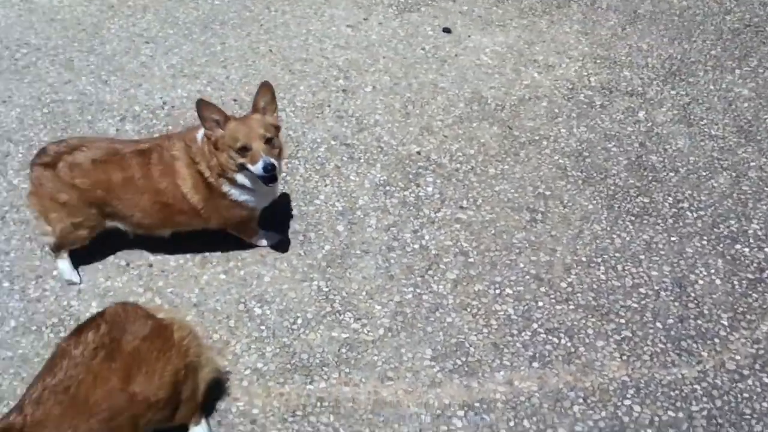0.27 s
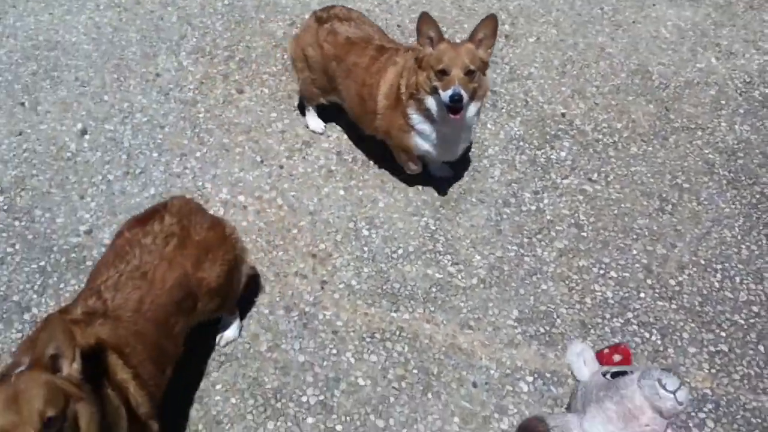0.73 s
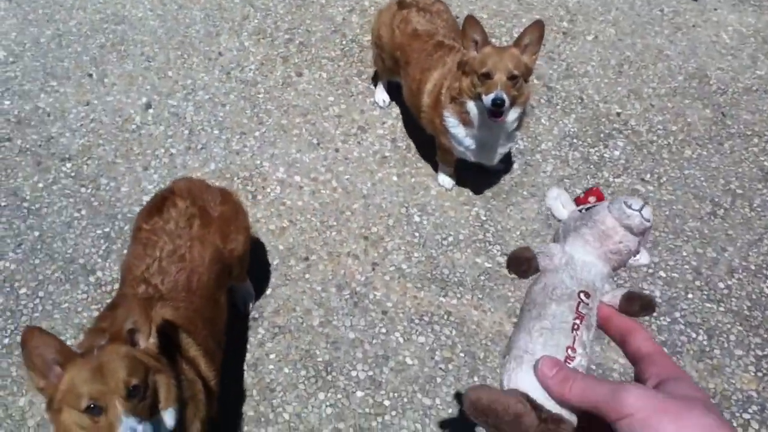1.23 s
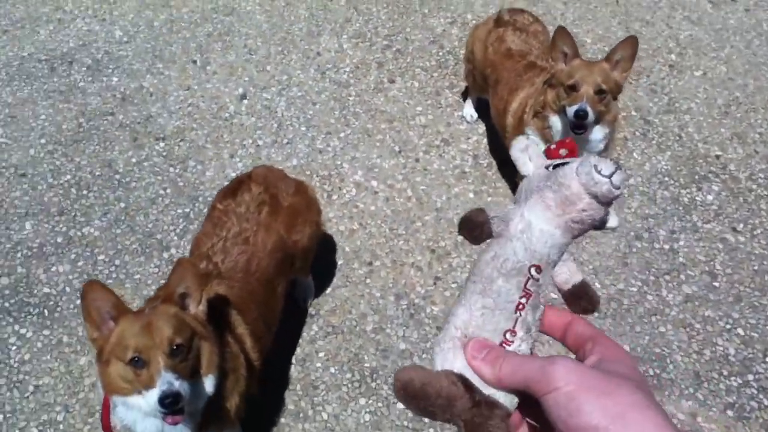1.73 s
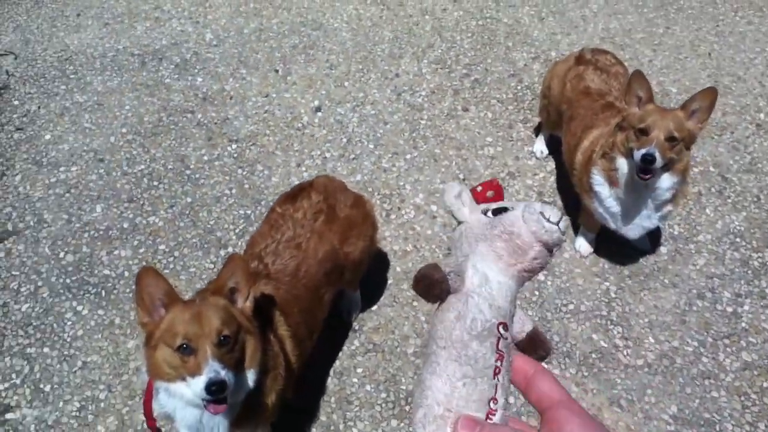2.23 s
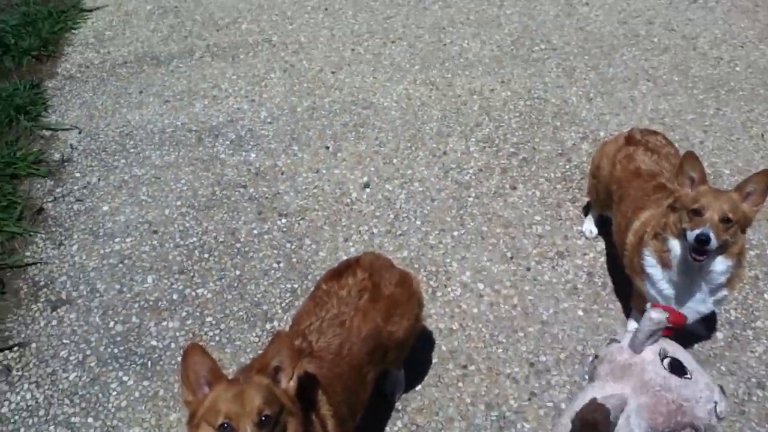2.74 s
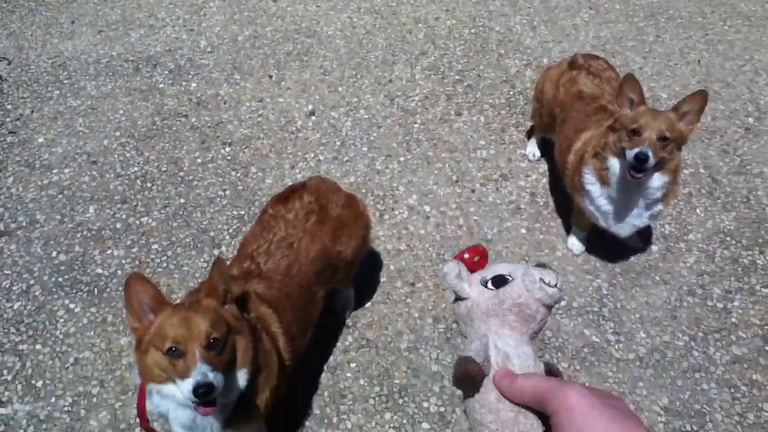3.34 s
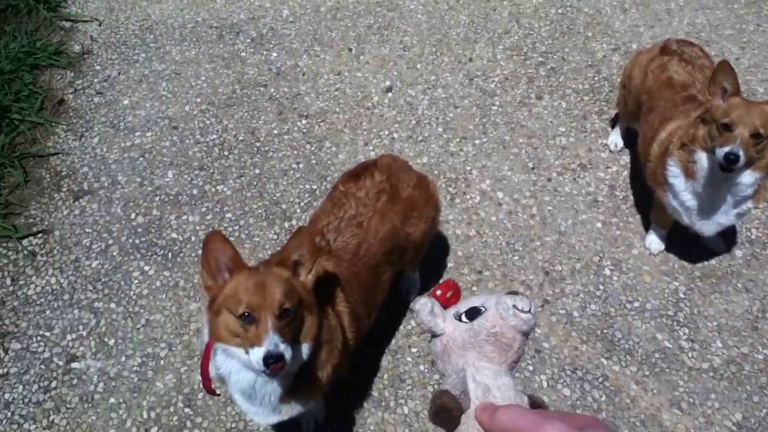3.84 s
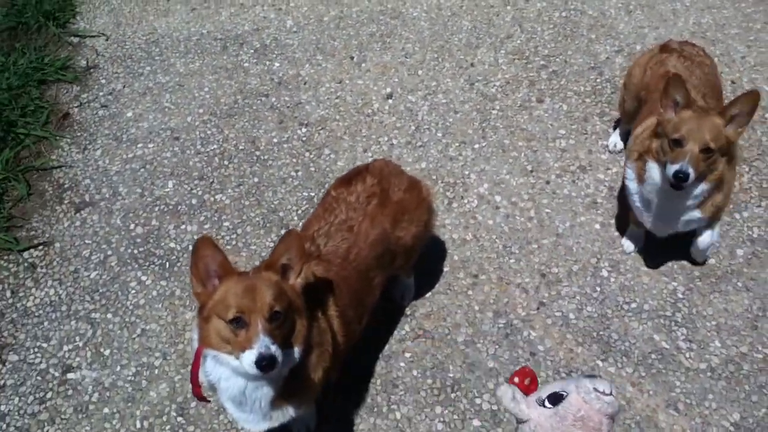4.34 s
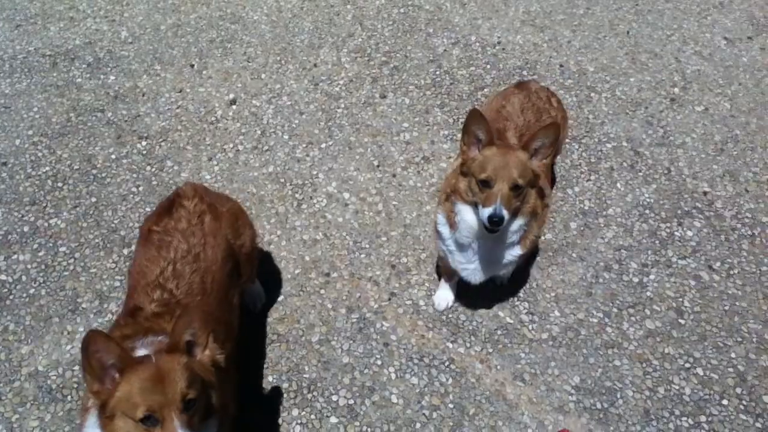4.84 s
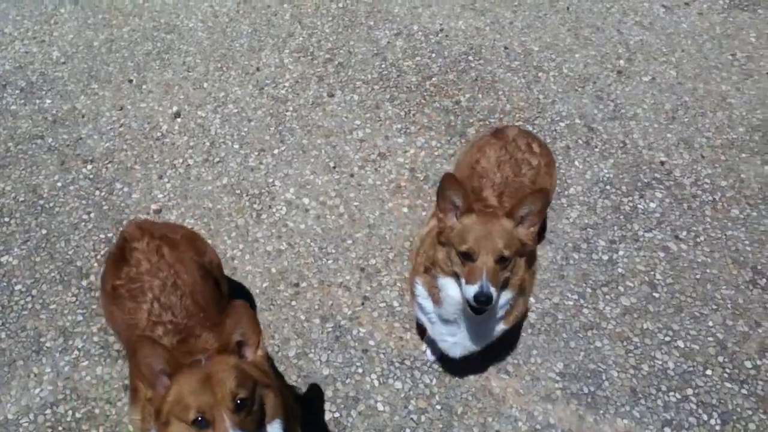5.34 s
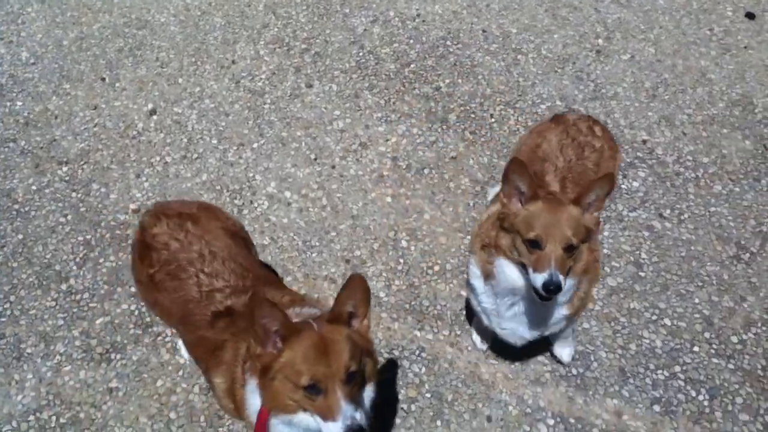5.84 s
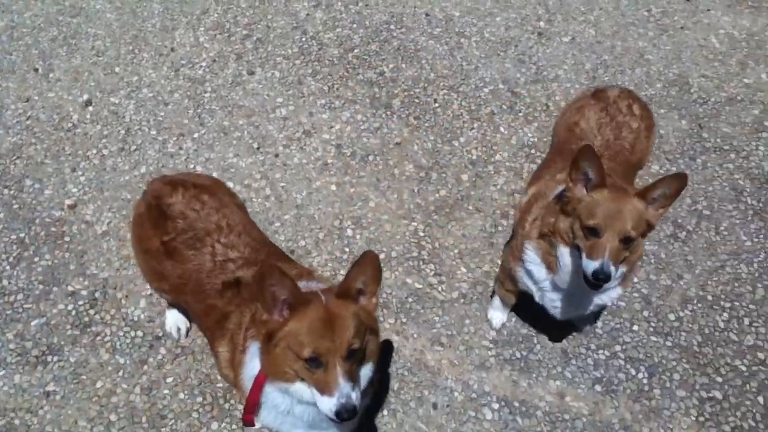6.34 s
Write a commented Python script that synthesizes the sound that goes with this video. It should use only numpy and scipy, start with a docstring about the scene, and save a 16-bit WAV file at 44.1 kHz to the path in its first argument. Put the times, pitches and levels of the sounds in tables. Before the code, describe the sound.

Two small dogs click and whine softly on paving before a hand-squeezed toy bursts into loud, arching high squeaks, each answered by a softer breathy one.

```python
"""Plush squeaker with dogs

A hand pumps a toy's reed squeaker over a paved drive: squeezes give bright arching squeaks, refills softer ones.
The reed is a stack of partials and leak hiss, coloured by the pipe, with a ground bounce and echo tails.
Dogs whine and whimper (gliding tones), pant and scuffle (swelling noise) and click their claws (ringing ticks).
Birds whistle as gliding sines; a resonant hiss comes and goes over a steady outdoor hush.
"""
import sys
import numpy as np
from scipy import signal
from scipy.fft import rfft, irfft
from scipy.io import wavfile
from scipy.ndimage import uniform_filter1d

SR = 44100
rng = np.random.default_rng(int(sys.argv[2]) if len(sys.argv) > 2 else 0)


def wrap_up_sound(samples):
    """Save the sound to the file named by the first command line argument, as 16-bit audio."""
    columns = np.atleast_2d(samples).T
    # keep every value between -1 and 1, then stretch to whole-number steps
    tamed = np.clip(columns, -1, 1)
    steps = np.round(tamed * 32767).astype(np.int16)
    wavfile.write(sys.argv[1], SR, steps)


N = 290613


def amp(db):
    """Decibels to gain."""
    return 10 ** (np.asarray(db) / 20)


def evened(x):
    """Scales to rms 1."""
    return x / np.sqrt(np.mean(x ** 2) + 1e-20)


def read(points, hz):
    """Reads a spectrum table on a log-frequency axis."""
    f, value = np.transpose(points)
    return np.interp(np.log(hz + 1), np.log(f + 1), value)


def add(mix, start_s, sound):
    """Mixes a sound in at its start time."""
    part = mix[round(start_s * SR):][:len(sound)]
    part += sound[:len(part)]


def wander(length, size):
    """Smooth random drift of rms 1: white noise averaged twice over size samples."""
    once = uniform_filter1d(rng.standard_normal(length), size)
    return evened(uniform_filter1d(once, size))


def noise(colour, patchy_db):
    """Random short-time spectra with a colour and drifting patches, rms 1."""
    frames, hz = N // 256 + 5, np.fft.rfftfreq(1024, 1 / SR)
    real, imag, patches = rng.standard_normal((frames, 513, 3)).T
    patches = uniform_filter1d(patches, 12, 0)  # across frequency
    patches = evened(uniform_filter1d(patches, 14, 1))  # across time
    spectra = (real + 1j * imag) * amp(read(colour, hz)[:, None] + patchy_db * patches)
    return evened(signal.istft(spectra, nperseg=1024, noverlap=768)[1][:N])


def swell(t, start_s, hold_s, db, rise_db_per_s, fall_db_per_s):
    """Gain that rises to its level at start, holds, and falls away."""
    before_s = np.maximum(start_s - t, 0)
    after_s = np.maximum(t - start_s - hold_s, 0)
    return amp(db - rise_db_per_s * before_s - fall_db_per_s * after_s)


def swells(rows, rise_db_per_s, fall_db_per_s):
    """Sum of all swells of a table on one time line."""
    t = np.arange(N) / SR
    return sum(swell(t, *row, rise_db_per_s, fall_db_per_s) for row in rows)


def scatter(x, t60_s, build_s, dull_db_per_khz):
    """Diffuse echoes from walls and hedges: sparse taps of random sign, treble dying first."""
    taps = np.zeros(SR // 2)
    at = np.arange(0, len(taps) - 20, 20)
    taps[at + rng.integers(0, 20, len(at))] = rng.choice([-1., 1.], len(at))
    hz, t, spectra = signal.stft(taps, SR, nperseg=256)
    hz = hz[:, None]
    fall_db = -60 * t / t60_s * (1 + hz / 9000) - dull_db_per_khz * hz / 1000
    build = np.clip(t / build_s, 0, 1)
    tail = signal.istft(spectra * amp(fall_db) * build, SR, nperseg=256)[1]
    return signal.fftconvolve(x, tail / np.linalg.norm(tail))[:N]


def bounce(x, delay_s, db, dull_hz):
    """One reflection from a hard surface, dulled by a first-order low-pass."""
    late = np.r_[np.zeros(round(delay_s * SR)), x][:N]
    return amp(db) * signal.lfilter(*signal.butter(1, dull_hz, fs=SR), late)


# Outdoor hush spectrum. Each row: frequency in Hz, relative density in dB per Hz.
HUSH_COLOUR = [(15, -55.5), (25, -31.5), (68, -5), (242, -3.5), (277, -3), (416, -9.5), (591, -6),
               (1230, -15.5), (2160, -17), (4610, -20.5), (6050, -23.5), (6740, -22.5), (16000, -28)]
HUSH_RMS_DB = -54


def outdoor_hush():
    """Steady broadband noise, strongest in the lows."""
    return amp(HUSH_RMS_DB) * noise(HUSH_COLOUR, patchy_db=1.5)


# Level curve of the far hiss. Each row: time in seconds, level in dB.
FAR_HISS_LEVELS = [(0.0, -65), (0.37, -57), (0.701, -84), (0.85, -77), (0.91, -48.5), (1.01, -68),
                   (1.28, -59), (1.55, -55), (1.95, -78), (2.02, -64), (2.38, -60.5), (2.8, -87),
                   (3.38, -68), (3.44, -58)]
FAR_HISS_HZ, FAR_HISS_Q = 2150, 5.5


def far_hiss():
    """White noise through one resonance, swelling and fading along its curve."""
    s, db = np.transpose(FAR_HISS_LEVELS + [(3.6, -69)])
    band = signal.lfilter(*signal.iirpeak(FAR_HISS_HZ, FAR_HISS_Q, SR), rng.standard_normal(N))
    return amp(np.interp(np.arange(N) / SR, s, db)) * evened(band)


def whistle(hz, db, waver):
    """A thin sine with soft ends, wavering in pitch (share) and level."""
    hz = hz * (1 + waver * wander(len(hz), size=60))
    gain = amp(db + 2.6 * wander(len(hz), size=120)) * signal.windows.tukey(len(hz), .4)
    return gain * np.sin(2 * np.pi * np.cumsum(hz) / SR)


# Short bird strokes. Each row: start in seconds, end in seconds, start in Hz, end in Hz, level in dB.
BIRD_STROKES = [(.04, 0.056, 4300, 3700, -60), (0.08, 0.1, 3450, 4330, -61),
                (1.301, 1.329, 3840, 3000, -53), (1.348, 1.359, 3600, 2490, -53),
                (1.372, 1.395, 3420, 2500, -55), (1.898, 1.931, 3920, 4600, -58),
                (1.927, 2.0, 4470, 2120, -58), (1.965, 2.0, 4250, 4200, -61),
                (2.01, 2.033, 3150, 3270, -56), (2.366, 2.425, 4300, 4200, -59),
                (2.754, 2.765, 4520, 3900, -58), (2.778, 2.795, 3200, 4000, -62),
                (2.872, 2.885, 2390, 1300, -55), (2.922, 3.006, 3060, 1340, -64),
                (3.283, 3.329, 4000, 3580, -55.5), (3.357, 3.415, 3180, 3090, -58)]
# Long notes of one high bird. Each row: start in seconds, level in dB.
LONG_NOTES = [(1.36, -59.5), (3.11, -58.5)]
# Pitch curve of each long note. Each row: seconds after its start, pitch in Hz.
LONG_TUNE = [(0, 6450), (.03, 6020), (.15, 5950), (.19, 5360)]


def birds():
    """Thin whistles: short strokes glide straight, long notes share one pitch curve."""
    out = np.zeros(N)
    for start_s, end_s, start_hz, end_hz, db in BIRD_STROKES:
        glide_hz = np.linspace(start_hz, end_hz, round((end_s - start_s) * SR))
        add(out, start_s, whistle(glide_hz, db, waver=.016))
    s, hz = np.transpose(LONG_TUNE)
    tune_hz = np.interp(np.arange(0, s[-1], 1 / SR), s, hz)
    for start_s, db in LONG_NOTES:
        add(out, start_s, whistle(tune_hz, db, waver=.005))
    return out


# A finger taps the phone. The row: time in seconds, level in dB, pitch in Hz.
PHONE_TAP = (5.96, -30.5, 340)


def phone_tap():
    """A dull push on the phone body: a low sine that dies 60 dB in 19 ms."""
    out, t = np.zeros(N), np.arange(900) / SR
    start_s, db, hz = PHONE_TAP
    add(out, start_s, amp(db - 60 * t / 0.019) * np.sin(2 * np.pi * hz * t))
    return out


# Huffs and scuffles of the dogs. Each row: start in seconds, hold in seconds, level in dB.
HUFFS = [(0, 0.077, -56.5), (.17, .03, -55), (.36, 0.071, -50), (.46, 0.14, -53.5), (.745, 0.055, -54.5),
         (.885, .06, -53.5), (1.26, 0.11, -60), (1.5, 0.19, -58), (1.98, .06, -68), (2.58, .02, -56.5),
         (3.0, 0.036, -60.5), (3.33, 0.16, -62)]
# Their spectrum. Each row: frequency in Hz, relative density in dB per Hz.
HUFF_COLOUR = [(250, -45), (470, -1.5), (800, 0), (1060, -3.5), (1590, -5), (1820, 1), (2630, -7.5),
               (3050, -6), (7830, -16), (8850, -14.5), (15000, -36)]
HUFF_RISE_DB_PER_S, HUFF_FALL_DB_PER_S = 313, 235
GRIT_PER_S, GRIT_DB = 400, -15.5  # grit level is relative to the breath


def huffs():
    """Breathy noise that swells with the dogs' bustle, with random grit grains crackling under their paws."""
    size_db = 3.5 * np.minimum(rng.exponential(1, N), 4)
    grains = amp(size_db) * (rng.random(N) < GRIT_PER_S / SR) * rng.choice([-1, 1], N)
    band = signal.butter(2, [3500, 11000], "bandpass", fs=SR)
    grit = evened(signal.lfilter(*band, grains))
    breath = noise(HUFF_COLOUR, patchy_db=3.0)
    return swells(HUFFS, HUFF_RISE_DB_PER_S, HUFF_FALL_DB_PER_S) * (breath + amp(GRIT_DB) * grit)


# Claws on the paving. Each row: time in seconds, level in dB.
CLAWS = [(0.0943, -40), (0.1014, -49), (0.138, -41), (0.179, -33.5), (0.1954, -36.5), (0.39, -37),
         (0.397, -37), (0.408, -31), (0.416, -34), (0.49, -36.5), (0.607, -31), (0.624, -35), (0.782, -36),
         (0.8395, -40), (0.8677, -34), (0.9244, -39), (0.937, -33), (0.947, -36), (1.0665, -43),
         (1.074, -38.5), (1.089, -40), (2.58, -41), (4.3287, -36), (5.2494, -27)]
CLAW_LOW_HZ, CLAW_HIGH_HZ = 3950, 7270  # each tick rings somewhere in this range
LIGHT_CLAWS_PER_S, LIGHT_CLAW_DB, SETTLED_S = 7, -40.5, 1.15  # random lighter ticks until the dogs settle
CLAW_T60_S, SLOT_S = 0.0093, .01


def claws():
    """Short ticks: a gritty click and a sine ring that die together."""
    out, t = np.zeros(N), np.arange(400) / SR
    band = signal.butter(2, [3000, 12000], "bandpass", fs=SR)
    slots = np.arange(0, SETTLED_S, SLOT_S)
    light = slots[rng.random(len(slots)) < LIGHT_CLAWS_PER_S * SLOT_S]
    for start_s, db in CLAWS + [(s, LIGHT_CLAW_DB) for s in light]:
        hz = rng.uniform(CLAW_LOW_HZ, CLAW_HIGH_HZ)
        grit = signal.lfilter(*band, rng.standard_normal(400))
        ring = np.sin(2 * np.pi * hz * t)
        add(out, start_s, amp(db - 60 * t / CLAW_T60_S) * (.5 * ring + 0.86 * grit))
    return out


# Panting puffs close by. Each row: start in seconds, hold in seconds, level in dB.
PANTS = [(5.345, 0.0068, -37), (5.72, 0.038, -37.5), (6.13, .06, -32.5), (6.54, .05, -41.5)]
# Softer air between the puffs. The row: start in seconds, hold in seconds, level in dB.
PANT_REST = (5.4, 0.68, -48.5)
# The open mouth they ring. Each row: frequency in Hz, relative density in dB per Hz.
MOUTH_COLOUR = [(250, -42), (600, -15), (1100, -10.5), (1550, -1.5), (2050, -2.5), (2600, -4.5), (3700, -2),
                (4700, -8.5), (6000, -16), (9000, -22.5), (14000, -38)]
PANT_RISE_DB_PER_S, PANT_FALL_DB_PER_S = 502, 255


def pants():
    """Puffs of air noise coloured by the nearer dog's mouth."""
    gain = swells(PANTS + [PANT_REST], PANT_RISE_DB_PER_S, PANT_FALL_DB_PER_S)
    return gain * noise(MOUTH_COLOUR, patchy_db=5.0)


# Thin whimpers. Each row: start in seconds, end in seconds, start in Hz, end in Hz, start in dB, end in dB,
# pitch roughness as a share.
WHIMPERS = [(.735, 0.823, 630, 618, -57, -58, 0.023), (1.487, 1.665, 600, 592, -49.5, -56.5, 0.04),
            (4.94, 5.07, 1120, 1200, -35.5, -42, .004), (5.576, 5.76, 1004, 1252, -45.5, -36.5, 0.0045),
            (5.778, 5.843, 920, 990, -47.5, -41, .011), (6.218, 6.253, 983, 1030, -50, -41, .01)]
# Colour of their open mouth. Each row: frequency in Hz, gain in dB.
WHIMPER_COLOUR = [(550, -18), (1150, -10.5), (1800, 6), (2300, -5.5), (3000, 1), (3500, -2.5), (4700, -12),
                  (6000, -18), (8000, -33)]


def whimpers():
    """Faint cries through an open mouth: eight harmonics of a rough gliding pitch."""
    out, k = np.zeros(N), np.arange(1, 9)[:, None]
    for start_s, end_s, start_hz, end_hz, start_db, end_db, rough in WHIMPERS:
        count = round((end_s - start_s) * SR)
        hz = np.linspace(start_hz, end_hz, count) * (1 + rough * wander(count, size=80))
        turns = np.cumsum(hz) / SR
        partial_gain = amp(read(WHIMPER_COLOUR, k * (start_hz + end_hz) / 2))
        stack = partial_gain * np.cos(2 * np.pi * (k * turns + rng.random(k.shape)))
        gain = amp(np.linspace(start_db, end_db, count)) * signal.windows.tukey(count, .25)
        add(out, start_s, gain * evened(stack.sum(0)))
    return out


def whine(hz, gain):
    """A slightly unsteady near-sine with a weak octave."""
    turns = np.cumsum(hz * (1 + .004 * wander(len(hz), size=400))) / SR
    tone = np.sin(2 * np.pi * turns) + amp(-28.5) * np.sin(4 * np.pi * turns)
    return np.sqrt(2) * gain * amp(wander(len(hz), size=500)) * tone


# Long whines, one table each. Each row: time in seconds, pitch in Hz, level in dB.
LONG_WHINES = [
    [(0, 712, -42), (.045, 736, -42.5), (.07, 601, -37), (.1, 544, -58)],
    [(.725, 644, -56), (.75, 648, -41.5), (.772, 570, -40), (.792, 716, -37), (.85, 702.3, -41),
     (.91, 673, -38), (.935, 615.6, -41.5), (1.03, 565, -53), (1.14, 537, -65)],
    [(6.49, 598, -87.5), (6.52, 574, -45.5), (6.562, 669, -33), (6.59, 642, -40)],
]
# Short whines. Each row: start in seconds, length in seconds, start in Hz, end in Hz, level in dB.
YIPS = [(0.107, 0.039, 683, 746, -46), (0.191, 0.028, 725, 745, -47), (0.441, 0.067, 582, 584, -43),
        (.46, .1, 717, 730, -53), (0.97, 0.11, 700, 665, -54), (2.471, 0.078, 598, 627, -52.5),
        (2.5, 0.13, 745, 727, -55.5), (2.623, 0.04, 576, 590, -54), (2.656, 0.052, 690, 690, -55),
        (3.042, .05, 564, 575, -58), (3.09, .07, 597, 596, -61), (3.319, 0.047, 594, 590, -59),
        (3.343, 0.16, 702, 634, -56.5), (3.487, 0.14, 600, 570, -56), (3.635, 0.14, 614, 612, -57.5)]
YIP_RISE_DB_PER_S, YIP_FALL_DB_PER_S = 450, 897


def whines():
    """Closed-mouth whines: long ones follow their curves, short ones glide straight."""
    out = np.zeros(N)
    for rows in LONG_WHINES:
        s, hz, db = np.transpose(rows)
        t = np.arange(s[0], s[-1], 1 / SR)
        add(out, s[0], whine(np.interp(t, s, hz), amp(np.interp(t, s, db))))
    for start_s, length_s, start_hz, end_hz, db in YIPS:
        t = np.arange(-.05, length_s + .05, 1 / SR)  # room for the rise and the fall
        gain = swell(t, .015, length_s - .03, db, YIP_RISE_DB_PER_S, YIP_FALL_DB_PER_S)
        glide_hz = np.interp(t, [0, length_s], [start_hz, end_hz])
        add(out, start_s + t[0], whine(glide_hz, gain))
    return out


# Plush rubbing in the grip. Each row: start in seconds, hold in seconds, level in dB.
RUBS = [(5.69, 0.013, -63), (5.895, 0.023, -47), (6.295, 0.034, -38)]
RUB_RISE_DB_PER_S, RUB_FALL_DB_PER_S = 693, 600


def rubs():
    """Fine bright fibre noise, uneven in level."""
    fibres = rng.standard_normal(N) * amp(5 * wander(N, size=90))
    band = signal.butter(2, [4500, 13000], "bandpass", fs=SR)
    gain = swells(RUBS, RUB_RISE_DB_PER_S, RUB_FALL_DB_PER_S)
    return gain * evened(signal.lfilter(*band, fibres))


# The hand turns the toy away. Each row: time in seconds, share turned.
TURNED = [(5.2, 0.02), (5.7, 1), (6.3, 1.27)]
# Colour change at share 1. Each row: frequency in Hz, gain in dB.
TURNED_COLOUR = [(800, 4.5), (1300, 5.5), (2500, -1.5), (5000, -1), (8000, 3.1), (11000, 3), (15000, 11.5)]


def turned_share(s):
    """How far the toy is turned away at time s."""
    return np.interp(s, *np.transpose(TURNED))


def heard(colour, s):
    """The squeaker colour that reaches the microphone at time s."""
    return [(hz, db + turned_share(s) * read(TURNED_COLOUR, hz)) for hz, db in colour]


def arch(t, times, start, end, top, bow_up, bow_down, size):
    """Runs from start to top to end along two bowed lines, the corner rounded over size samples."""
    u = np.interp(t, times, [0, 1, 0])
    rising = t < times[1]
    straight = np.where(rising, start, end) * (1 - u) + top * u
    bow = 4 * u * (1 - u) * np.where(rising, bow_up, bow_down)
    return uniform_filter1d(straight + bow, size=size, mode="nearest")


RISE_BOW_DB = 0.18  # the level runs a little above a straight rise
PARTIALS, PARTIAL_LIMIT_HZ, FLUTTER_DB = 20, 18000, 1.8
LATE_ABOVE_HZ = 5000


def squeak(row, fall, colour, ring_late_s, hiss_db, jitter, attack_s, fade_db_per_s, size):
    """The reed chops the air once a cycle; the pulses and some leak hiss ring the pipe."""
    times, (start_hz, top_hz, rise_bow_hz, fall_bow_hz, start_db, top_db) = row[:3], row[3:]
    stall_hz, drop_db, fall_bow_db, droop_hz_per_s = fall
    t = np.arange(times[0] - attack_s, times[2] + 0.02, 1 / SR)
    after_s = np.maximum(t - times[2], 0)

    hz = arch(t, times, start_hz, stall_hz, top_hz, rise_bow_hz, fall_bow_hz, size=size)
    hz = hz * (1 + jitter * wander(len(t), size=40)) - droop_hz_per_s * after_s
    db = arch(t, times, start_db, top_db + drop_db, top_db, RISE_BOW_DB, fall_bow_db, size=100)
    db = db - fade_db_per_s * after_s

    grid_hz = np.fft.fftfreq(4096, 1 / SR)
    log_gain = np.log(amp(read(colour, abs(grid_hz))))
    lag = -signal.hilbert(log_gain).imag[:2048]  # phase of a causal pipe
    k = np.arange(1, PARTIALS + 1)[:, None]
    partial_hz = k * hz
    # the squashed plush shifts each partial's level
    flutter_db = FLUTTER_DB * np.array([wander(len(t), size=200) for _ in k])
    gain = amp(read(colour, partial_hz) + flutter_db) * (partial_hz < PARTIAL_LIMIT_HZ)
    phase = 2 * np.pi * k * np.cumsum(hz) / SR + np.interp(partial_hz, grid_hz[:2048], lag)
    # the high ring takes a longer way out
    phase -= 2 * np.pi * ring_late_s * np.maximum(partial_hz - LATE_ABOVE_HZ, 0)
    tone = -(gain * np.cos(phase)).sum(0) / np.sqrt((gain ** 2).sum(0) / 2)

    white = rfft(rng.standard_normal(len(t)))
    bins_hz = np.fft.rfftfreq(len(t), 1 / SR)
    leak_db = read([(400, -50)] + colour, bins_hz) + 1.1 * bins_hz / 1000  # brighter than the tone
    leak = evened(irfft(white * amp(leak_db), len(t)))
    opening = np.clip((t - t[0]) / (2 * attack_s), 0, 1) ** 2
    return t[0], amp(db) * opening * (tone + amp(hiss_db) * leak)


# Air blown out and air sucked in. Each row: start in seconds, let-go in seconds, end in seconds, start in Hz,
# let-go in Hz, bow of the pitch rise in Hz, bow of the pitch fall in Hz, start in dB, let-go in dB.
SQUEEZES = [(3.4627, 3.5066, 3.5175, 1025, 1216, 48.5, -97, -12.5, -11.5),
            (4.0249, 4.0683, 4.0814, 1008, 1677, 13.5, -270, -10.5, -12),
            (4.359, 4.401, 4.419, 1006, 3920, -400, -850, -12.5, -5.5),
            (4.63, 4.671, 4.688, 1059, 3720, -520, -850, -9.5, -7.5),
            (4.891, 4.933, 4.95, 1103, 3530, -480, -850, -11, -7),
            (5.1397, 5.1787, 5.1916, 1011, 2008, -16, -380, -9.5, -7),
            (5.3961, 5.4118, 5.4445, 1102, 1323, -41, 71, -9.5, -8.5),
            (5.613, 5.632, 5.6688, 1040, 1212, -9, 37.5, -17, -10.5),
            (5.8356, 5.8746, 5.8856, 1018, 1134, 101, -38, -14, -14.5),
            (6.054, 6.0816, 6.1021, 1037, 1297, 8, 4, -15.5, -13),
            (6.2626, 6.279, 6.312, 1084, 1087, -30, 18, -19.5, -16.5)]
REFILLS = [(3.6419, 3.687, 3.7169, 883, 1008, 12, -12.5, -23, -18),
           (4.2172, 4.253, 4.2858, 918, 1134, -56.5, 34, -21.5, -18.5),
           (4.498, 4.535, 4.569, 886, 1212, -75, -14.5, -24, -16.5),
           (4.77, 4.807, 4.844, 893, 1228, -44.5, -36, -22, -17),
           (5.0195, 5.056, 5.0959, 917, 1017, 1, 47, -22.5, -17),
           (5.2788, 5.318, 5.3498, 903, 1242, -7, -92, -22, -16.5),
           (5.5068, 5.543, 5.5796, 890, 932, 40.5, 34.5, -22.5, -20),
           (5.7278, 5.7503, 5.7877, 924, 1231, -50.5, -66, -21, -19),
           (5.955, 5.99, 6.0191, 873, 1057, 9.5, 5, -25, -21),
           (6.164, 6.186, 6.224, 935, 1071, -16.5, -2.5, -27.5, -21),
           (6.3674, 6.386, 6.4264, 902, 948, 0.5, 5, -27, -25.5),
           (6.568, 6.61, 6.63, 887, 990, -15, 5, -31.5, -34)]
# Colour of pipe and plush each way. Each row: frequency in Hz, gain in dB.
OUT_COLOUR = [(900, -16.5), (1500, -16), (2200, -17.5), (3300, -8.5), (4500, -7.5), (5800, -9.5),
              (7600, -3.5), (8400, -6.5), (9300, -20), (10500, -22), (12500, -38.5), (15500, -58)]
IN_COLOUR = [(800, -10), (1800, -11.5), (2700, -10.5), (3800, -7.5), (5000, -12.5), (5600, -16.5),
             (6100, -28.5), (6500, -16.5), (7000, -9.5), (7800, -2.5), (8700, -10.5), (9600, -14.5),
             (11500, -25), (13000, -42), (15500, -57)]
# The reed stalls at one pitch as the flow dies. The row: stall in Hz, change in level in dB, bow of that
# change in dB, droop after the end in Hz per second.
OUT_FALL = (977, -13, 3, 8998)
IN_FALL = (800, -9, 2.5, 14000)


def toy():
    """Squeezes turn sharply; on a refill the air flows the other way, more gently and more breathily."""
    out = np.zeros(N)
    for row in SQUEEZES:
        colour = heard(OUT_COLOUR, row[0])
        add(out, *squeak(row, OUT_FALL, colour, ring_late_s=.00001, hiss_db=-19, jitter=.007,
                         attack_s=0.002006, fade_db_per_s=3207, size=140))
    for row in REFILLS:
        colour = heard(IN_COLOUR, row[0])
        add(out, *squeak(row, IN_FALL, colour, ring_late_s=0.00021, hiss_db=-15, jitter=.005,
                         attack_s=0.001976, fade_db_per_s=5000, size=380))
    return out


def scene():
    """Hush, animals with their echoes, and the toy with its ground bounce and two echo tails."""
    far, cry, near = birds(), whines(), toy()
    background = outdoor_hush() + far_hiss()
    bird_echo = amp(-7.5) * scatter(far, t60_s=0.35, build_s=0.0144, dull_db_per_khz=.1)
    whine_echo = amp(-19) * scatter(cry, t60_s=0.96, build_s=0.0086, dull_db_per_khz=5.5)
    animals = far + bird_echo + cry + whine_echo
    bustle = phone_tap() + huffs() + claws() + pants() + whimpers() + rubs()
    early_tail = amp(-28.5) * scatter(near, t60_s=0.53, build_s=0.0063, dull_db_per_khz=0.29)
    late_tail = amp(-31.5) * scatter(near, t60_s=0.4, build_s=0.084, dull_db_per_khz=1.6)
    wetter = amp(2.9 * turned_share(np.arange(N) / SR))  # turned away, more comes back as echo
    ground = bounce(near, delay_s=.0055, db=-12, dull_hz=9100)
    return (background + animals + bustle + near + ground + wetter * (early_tail + late_tail))[None]


AVERAGE_S, THRESHOLD_DB, CUT_DB_PER_DB = .08, -27.0, 0.36
HELD_FALL_DB_PER_S = 8.5  # how fast the held loudness sinks
EDGE_HZ = 16250


def record(dry):
    """Gain control cuts by a held running loudness that sinks slowly; then a steep low-pass."""
    keep = np.exp(-1 / (AVERAGE_S * SR))
    power = signal.lfilter([1 - keep], [1, -keep], dry[0] ** 2)
    power_db = 10 * np.log10(power + 1e-12)
    sink_db = np.arange(N) * HELD_FALL_DB_PER_S / SR
    held_db = np.maximum.accumulate(power_db + sink_db) - sink_db
    over_db = np.maximum(held_db - THRESHOLD_DB, 0)
    ducked = dry / amp(CUT_DB_PER_DB * over_db)
    low_pass = signal.firwin(1023, EDGE_HZ, window=("kaiser", 9), fs=SR)
    return signal.oaconvolve(ducked, low_pass[None], "same")


dry = scene()
out = record(dry)
wrap_up_sound(out)
```